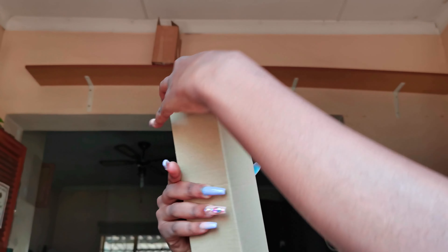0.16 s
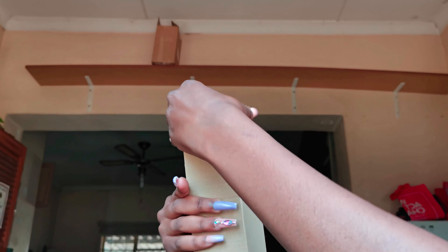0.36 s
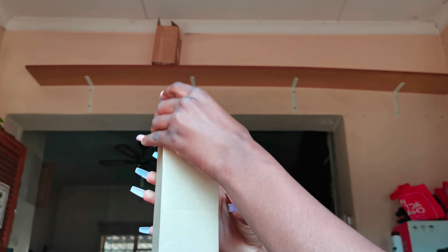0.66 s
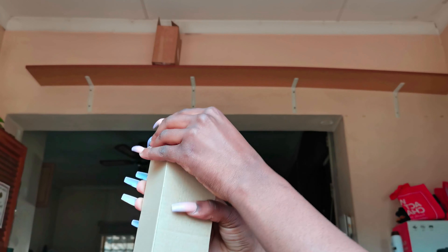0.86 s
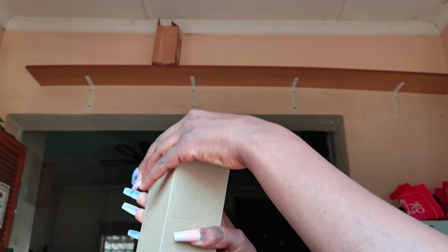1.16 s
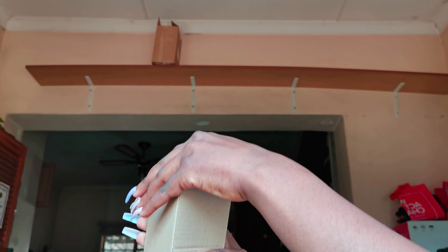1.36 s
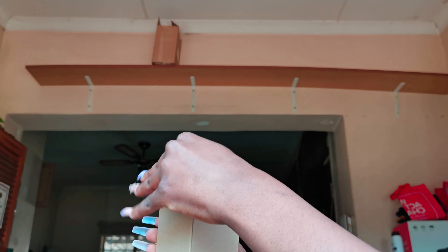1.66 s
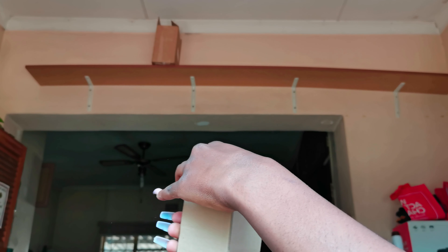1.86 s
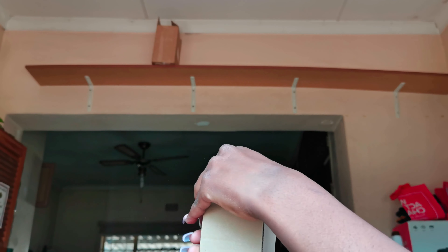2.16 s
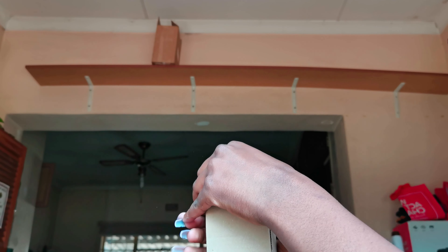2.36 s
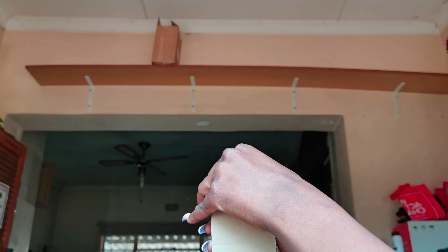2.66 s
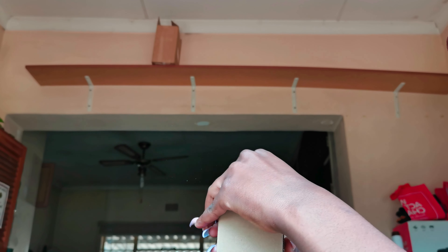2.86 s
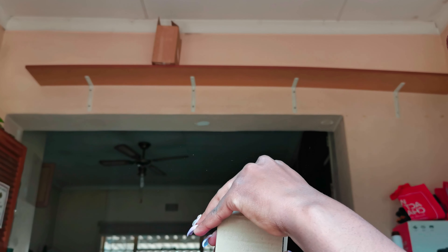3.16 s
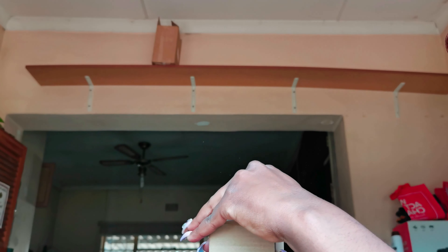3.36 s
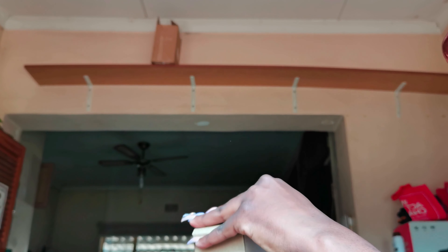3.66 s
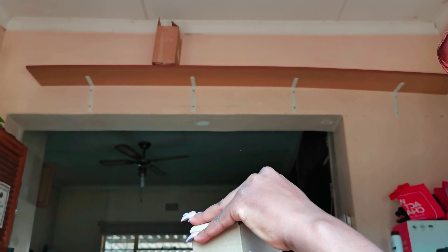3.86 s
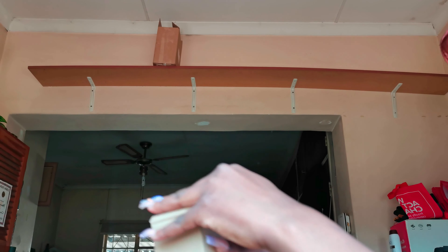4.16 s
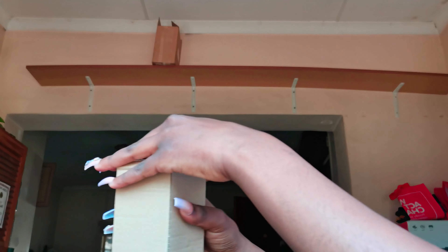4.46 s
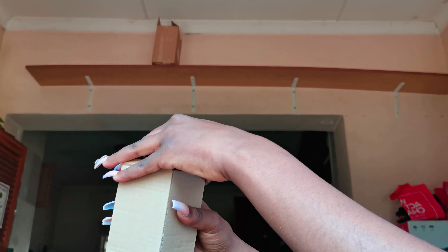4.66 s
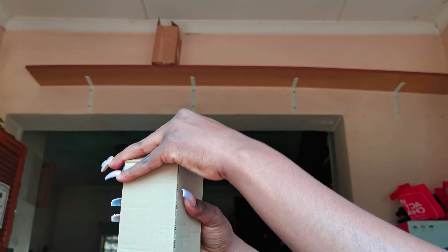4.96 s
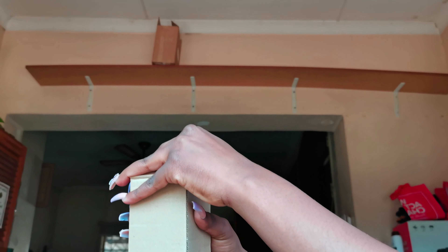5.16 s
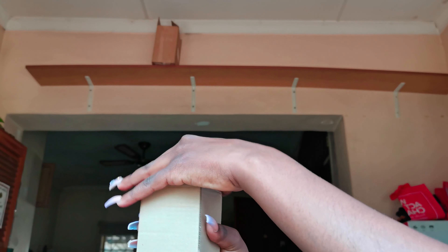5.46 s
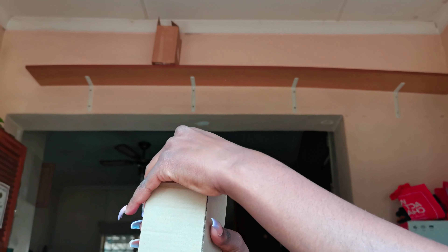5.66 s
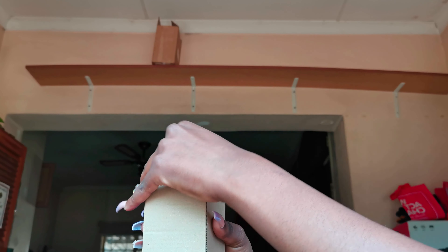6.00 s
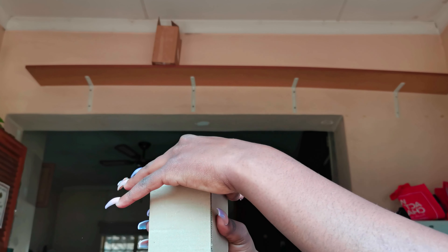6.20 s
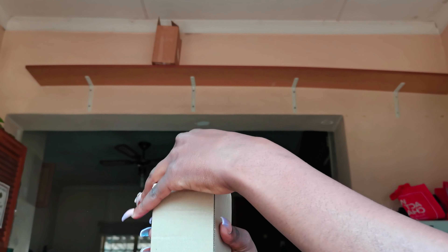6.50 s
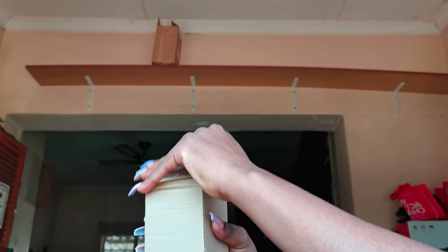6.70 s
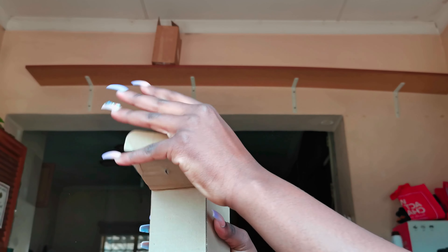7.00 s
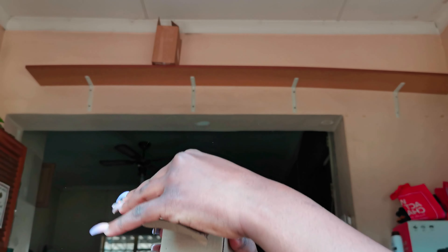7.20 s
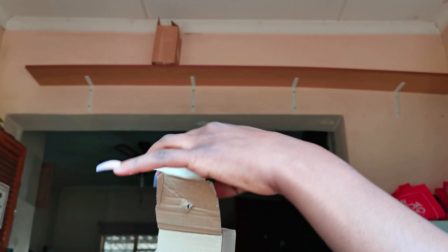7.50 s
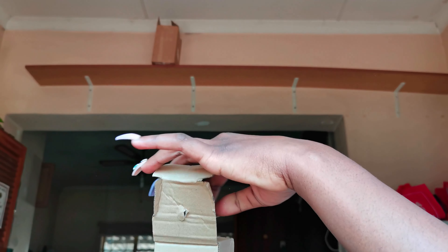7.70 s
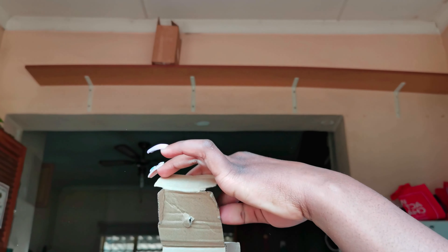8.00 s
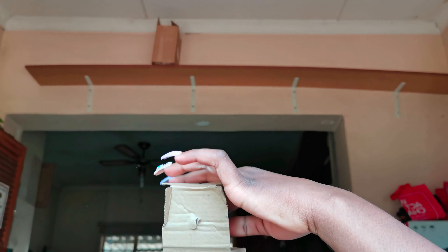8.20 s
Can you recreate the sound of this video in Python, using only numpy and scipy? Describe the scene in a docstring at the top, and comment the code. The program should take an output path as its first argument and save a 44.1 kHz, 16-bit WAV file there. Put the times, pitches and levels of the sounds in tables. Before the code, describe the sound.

Hands grip and rub a narrow cardboard box close to the microphone. Palms drag with a soft hollow sound while long fingernails scratch, tick and tap unevenly on its sides. A hard knock on the box comes early and another just past the middle, followed by a burst of quick scratches and more light tapping. The room is small and quiet, with a faint low hum.

```python
"""Long nails on a cardboard box

A small room, two microphones close to a narrow box that hands grip, scrape and tap. Palms drag on the
panels and stir the hollow; nails stick and slip on the paper skin, and its fibres hiss. Nail ticks,
taps and two hard knocks sound on the same box, over quiet room tone and a low hum."""
import sys
import numpy as np
from scipy import signal
from scipy.fft import rfft, irfft, next_fast_len
from scipy.io import wavfile
from scipy.ndimage import uniform_filter1d

SR = 44100
rng = np.random.default_rng(int(sys.argv[2]) if len(sys.argv) > 2 else 0)


def file_out(sig):
    """Save sig as 16-bit WAV at sys.argv[1]."""
    # one column per channel
    cols = np.atleast_2d(sig).T
    # limit, then scale
    lim = np.clip(cols, -1, 1)
    pcm = np.round(lim * 32767).astype(np.int16)
    wavfile.write(sys.argv[1], SR, pcm)


N = 367794
T = np.arange(N) / SR
COARSE = T[::32]  # time grid for slow movements, s

# modes of the box's hollow: f/Hz, level/dB, t60/s, share at the right microphone (-1..1)
HOLLOW_MODES = [(137.4, 2.6, 0.08, 0.84), (212.4, -1.7, 0.046, 0.68), (264.6, -3.15, 0.058, 0.52),
                (320.6, -0.5, 0.031, 0.91), (383.5, 0.87, 0.031, 0.86), (461, -1.2, 0.038, 0.8),
                (553.4, 1.55, 0.024, 0.97)]
# modes of the panels: f/Hz, level/dB, t60/s, share at the right microphone (-1..1)
PANEL_MODES = [(706, -1.5, 0.023, 0.6), (794, 5, 0.026, 0.58), (893, 3, 0.017, 0.62),
               (1022, 5, 0.022, -0.16), (1236, 1, 0.019, 0.73), (1345, 3, 0.026, -0.39),
               (1548, 3.5, 0.013, 0.98), (1703, 3.5, 0.026, 1), (1871, 5.5, 0.02, 0.74),
               (2112, 0, 0.016, 1), (2422, -1, 0.016, 0.49), (2830, -12, 0.045, 0.15)]
# spectrum of scraped paper fibres: f/Hz, level/dB
FIBRE_SPECTRUM = [(1590, -16.5), (2700, 5.5), (3070, -7), (3740, -2), (5240, -8), (6350, -7), (7010, -5.5),
                  (7590, -4), (8800, -22), (11400, -46), (19400, -120)]
# spectrum of the finest crackle and the nail ticks: f/Hz, level/dB
CRACKLE_SPECTRUM = [(5410, -46.5), (9200, -14), (9930, 3), (12800, -3.5), (14800, -0.5), (16000, -31)]
# hand strokes: peak t/s, swell/s, fade/s, palm/dB, nail/dB, fibre/dB, crackle/dB,
# panel centre f/Hz, hollow centre f/Hz
STROKES = [(0.02, 0.12, 0.097, -42.5, -51, -51, -50, 1480, 318),
           (0.093, 0.11, 0.066, -30.5, -34, -36, -38.5, 1090, 340),
           (.2, 0.066, 0.067, -46, -53, -47.5, -46, 1180, 336),
           (.26, 0.056, 0.19, -34, -47, -49.5, -52, 1380, 227),
           (.46, 0.063, 0.13, -33, -43, -44.5, -46, 1200, 450),
           (.56, 0.044, 0.13, -34, -62, -68, -83, 980, 180),
           (0.758, 0.056, 0.15, -34.5, -42.5, -52, -65, 810, 258),
           (.9, 0.076, 0.14, -41.5, -46, -53, -46.5, 910, 181),
           (1.059, 0.15, 0.096, -37, -40.5, -44.5, -43, 860, 490),
           (1.2, 0.069, 0.032, -44.5, -52, -52, -64, 930, 149),
           (1.295, 0.036, 0.052, -55.5, -54, -53.5, -64, 1340, 497),
           (1.83, 0.043, .12, -43, -55.5, -50, -50, 1530, 163),
           (1.954, 0.088, 0.058, -39.5, -46.5, -49, -47, 1130, 377),
           (2.188, 0.14, 0.19, -50, -53, -58, -63.5, 1450, 435),
           (2.339, 0.05, 0.095, -40.5, -42.5, -51.5, -61, 900, 450),
           (2.466, 0.08, 0.22, -51.5, -52.5, -56, -64, 1010, 280),
           (2.649, 0.053, 0.059, -45.5, -44, -48, -48.5, 2070, 380),
           (2.82, 0.086, 0.24, -55, -54.5, -66.5, -79, 1650, 358),
           (3.004, 0.064, 0.055, -44.5, -42.5, -43.5, -46, 1120, 310),
           (3.32, 0.071, 0.11, -51, -51, -49.5, -49, 2130, 317),
           (3.404, 0.023, 0.14, -32.5, -43, -43.5, -51, 1080, 275),
           (3.48, 0.063, 0.12, -39, -43.5, -49.5, -49, 870, 396),
           (3.71, 0.079, 0.071, -48, -26.5, -40, -38, 1500, 449),
           (3.84, 0.036, 0.14, -54, -42.5, -42, -42, 1870, 418),
           (3.913, 0.12, 0.13, -49, -29, -36.5, -42, 1660, 463),
           (4.135, 0.032, 0.045, -37, -36.5, -40.5, -47, 1550, 304),
           (4.269, 0.038, 0.073, -44, -48, -47.5, -47.5, 1020, 300),
           (4.36, 0.1, 0.063, -50.5, -50.5, -47, -46.5, 1100, 342),
           (4.45, .03, 0.12, -49, -55.5, -52.5, -57, 1300, 400),
           (4.553, 0.044, .1, -40.5, -64.5, -73, -70, 1240, 196),
           (4.801, .08, 0.13, -51, -49.5, -59.5, -72, 815, 160),
           (5.11, 0.022, .07, -35.5, -27, -31.5, -43, 1400, 436),
           (5.19, 0.019, 0.047, -46, -28, -46, -60, 1330, 417),
           (5.245, 0.027, 0.04, -50, -40, -57.5, -65, 1270, 307),
           (5.39, 0.078, 0.078, -43, -39, -46, -57, 910, 374),
           (5.45, 0.1, 0.08, -51, -51, -51.5, -53, 900, 400),
           (5.51, 0.027, 0.087, -43.5, -54, -48, -52, 1360, 402),
           (5.61, 0.051, 0.12, -48, -50, -50.5, -58, 1410, 244),
           (5.74, 0.14, 0.15, -47.5, -42.5, -58, -75, 920, 400),
           (5.809, 0.064, 0.059, -46, -39.5, -46.5, -51.5, 1540, 400),
           (5.94, 0.16, 0.26, -48.5, -51.5, -54, -64, 1110, 380),
           (6.086, 0.052, 0.064, -37.5, -44, -50.5, -49, 860, 470),
           (6.224, .04, 0.059, -44.5, -50, -62, -56, 1180, 241),
           (6.392, 0.044, 0.053, -43.5, -45.5, -49, -49, 1540, 503),
           (6.519, 0.059, .14, -41.5, -41.5, -39.5, -40.5, 1140, 426),
           (6.678, 0.02, 0.078, -39, -33, -40.5, -41, 1630, 443),
           (6.77, 0.076, 0.083, -40.5, -44, -42, -47, 1400, 450),
           (6.878, 0.11, .13, -41.5, -50.5, -49, -44, 1380, 220),
           (7.071, 0.029, 0.11, -54.5, -53.5, -51.5, -53, 2170, 346),
           (7.151, .07, 0.096, -48, -52.5, -54, -61, 964, 410),
           (7.275, 0.047, .04, -65, -57.5, -52.5, -57, 1190, 226),
           (7.39, 0.059, .12, -34.5, -53, -53, -60, 1690, 193),
           (7.556, .04, 0.096, -40.5, -55, -51.5, -66, 1790, 390),
           (7.705, 0.044, 0.047, -40, -55, -66, -73, 814, 470),
           (7.84, 0.063, 0.11, -35.5, -37, -53.5, -55, 960, 303),
           (7.949, .03, 0.17, -38, -37.5, -50, -51.5, 1310, 390),
           (8.12, 0.19, 0.19, -49, -50, -48, -55, 1050, 273),
           (8.211, 0.02, 0.052, -33, -56, -40.5, -50, 1160, 282),
           (8.245, 0.016, 0.054, -57, -45.5, -44, -55, 2460, 318),
           (8.335, 0.041, .05, -36.5, -51.5, -75, -80, 1290, 218)]


def undb(db):
    """dB to gain."""
    return 10 ** (np.asarray(db) / 20)


def unit(x):
    """Scale to rms 1."""
    return x / np.sqrt(np.mean(x ** 2, axis=-1, keepdims=True))


def coloured(x, spectrum):
    """Filter by (f/Hz, level/dB) points joined on a log axis."""
    size = next_fast_len(x.shape[-1])
    hz, db = np.transpose(spectrum)
    log_f = np.log(np.arange(size // 2 + 1) * SR / size + 1)
    gain = undb(np.interp(log_f, np.log(hz), db))
    return irfft(rfft(x, size) * gain, size)[..., :x.shape[-1]]


def ring(x, hz, t60):
    """One decaying mode, unit power on unit noise."""
    r = np.exp(-np.log(1000) / (t60 * SR))
    w = 2 * np.pi * hz / SR
    return signal.lfilter([np.sin(w) * np.sqrt(2 * (1 - r * r))], [1, -2 * r * np.cos(w), r * r], x)


def wander(per_s):
    """Random levels, held and slewed on the coarse grid: a slow waver with spread near 1.5."""
    hold = int(len(COARSE) / T[-1] / per_s)
    steps = np.repeat(rng.standard_normal(len(COARSE) // hold + 1), hold)
    return 1.827 * uniform_filter1d(steps, hold)[:len(COARSE)]


def smooth(x):
    """From the coarse grid to every sample."""
    return np.interp(T, COARSE, x)


def room_tone():
    """The room's quiet air, drifting in level, with a wavering low hum."""
    # spectrum of the air: f/Hz, level/dB
    air_spectrum = [(15, -35), (25, 5.5), (78, 14.5), (229, -12.5), (354, -3), (2220, -20.5), (2610, -18),
                    (3160, -25), (7510, -29), (8830, -48), (9840, -24), (13600, -26.5), (16000, -30)]
    # bands of the hum: f/Hz, width/Hz, level/dB
    hum_bands = [(69.5, 17, -59.5), (136, 14, -58)]
    noise = rng.standard_normal((2, N)) + 0.76 * rng.standard_normal(N)
    air = undb(-51.5) * unit(coloured(noise, air_spectrum))
    drift = smooth(undb(1.8 * wander(per_s=3.66)))
    drive = rng.standard_normal(N)
    hum = sum(undb(db) * ring(drive, hz, t60=2.3 / width) for hz, width, db in hum_bands)
    return air * drift + hum


def stroke_gains():
    """Each stroke swells from silence and fades; gains of palm, nail, fibre and crackle."""
    flatten = 1.24  # over 1 flattens the top of a stroke
    edges = [1.04, 1.18, 1.27, 1.9]  # the higher, the sooner a layer dies toward the stroke's ends
    peak_s, swell_s, fade_s, *layer_db = np.array(STROKES)[:, :-2].T
    since = COARSE - peak_s[:, None]
    away = np.where(since < 0, -since / swell_s[:, None], since / fade_s[:, None])
    press = np.clip(1 - away ** flatten, 0, 1)
    return [smooth(np.sqrt(undb(db) ** 2 @ (press ** edge) ** 2)) for db, edge in zip(layer_db, edges)]


def touched_spot(t):
    """Centre pitches of panel and hollow, in Hz, as the hands move from stroke to stroke."""
    peak_s, *_, panel_hz, hollow_hz = np.transpose(STROKES)
    return np.interp(t, peak_s, panel_hz), np.interp(t, peak_s, hollow_hz)


def response(hz, centre_hz, octaves):
    """Modes near the touched spot's own pitch answer most."""
    return np.exp(-.5 * (np.log2(hz / centre_hz) / octaves) ** 2)


def stick_slip(per_s, spread_db, drag):
    """Friction: clicks of very uneven size over a smooth drag, rms near 1 at all times."""
    size_db = rng.exponential(1, N) * spread_db
    clicks = (rng.random(N) < per_s / SR) * undb(size_db) * rng.choice([-1, 1], N)
    force = clicks + drag * rng.standard_normal(N)
    return force / np.sqrt(uniform_filter1d(force ** 2, size=SR // 12) + 1e-12)


def rubbed_modes(force, modes, centre_hz, octaves, flicker_db, per_s):
    """A force spread over the modes near the touched spot; each share flickers as the hand moves."""
    total = np.sqrt(sum(response(hz, centre_hz, octaves) ** 2 for hz, *_ in modes))
    out = np.zeros((2, N))
    for k, (hz, db, t60, right) in enumerate(modes):
        share = smooth(response(hz, centre_hz, octaves) / total * undb(db + flicker_db * wander(per_s)))
        out += np.outer([1, right], (-1) ** k * ring(force * share, hz, t60))
    return out


def torn_fibres(slip, spectrum, flicker_db):
    """Fibre noise with clicks in it; the two microphones hear partly different fibres."""
    noise = rng.standard_normal(N) + rng.standard_normal((2, N))
    flicker = smooth(undb(flicker_db * wander(per_s=60)))
    return unit(coloured(slip + noise * flicker, spectrum))


def rubbing():
    """Palm drag feeds the hollow; nail slips ring the panels and the skin and tear the fibres."""
    # paper skin under a sliding nail: f/Hz, level/dB, t60/s, share at the right microphone (-1..1)
    skin_modes = [(3710, 1.5, 0.0067, 0.54), (4470, -4.5, 0.0073, 0.2), (5300, -4.5, 0.0079, -0.9),
                  (6350, 2.5, .006, -0.8), (7420, 3, 0.0046, -0.8)]
    palm, nail, fibre, fine = stroke_gains()
    panel_hz, hollow_hz = touched_spot(COARSE)
    drag = stick_slip(per_s=300, spread_db=2.4, drag=0.051)
    slip = stick_slip(per_s=1200, spread_db=2.8, drag=0.059)
    hollow = rubbed_modes(palm * drag, HOLLOW_MODES, hollow_hz, octaves=0.91, flicker_db=3.03, per_s=25)
    panels = rubbed_modes(nail * slip, PANEL_MODES, panel_hz, octaves=0.66, flicker_db=3.08, per_s=30)
    hiss = torn_fibres(0.58 * slip, FIBRE_SPECTRUM, flicker_db=2.8)
    fine_slip = stick_slip(per_s=460, spread_db=4.0, drag=0.064)
    crackle = torn_fibres(0.45 * fine_slip, CRACKLE_SPECTRUM, flicker_db=2.3)
    # the skin sings in a few broad rings that come and go with the nail's angle
    skin_force = fibre * undb(-2.5) * stick_slip(per_s=2500, spread_db=2.3, drag=.15)
    skin = rubbed_modes(skin_force, skin_modes, centre_hz=5030, octaves=2.5, flicker_db=3.0, per_s=12)
    return hollow + panels + skin + fibre * hiss + fine * crackle


def contact_bursts(count, t, spectrum, decay_s):
    """Stereo noise bursts, one a contact: a first snap over a short decay."""
    snap = undb(4) * np.exp(-t / 0.0008)
    noise = unit(coloured(rng.standard_normal((count, 2, len(t))), spectrum))
    return noise * (snap + np.exp(-t / decay_s)) / 2


def nail_ticks():
    """Nail tips click brightly on the paper; rows left, right, room feed."""
    # nail contacts: t/s, level/dB
    contacts = [(0.0948, -17.5), (0.432, -21), (1.1927, -36), (1.2884, -28.5), (1.513, -18), (2.331, -27.5),
                (2.441, -43), (3.3947, -31), (3.445, -31), (4.129, -40), (4.44, -43), (4.8236, -44),
                (4.9406, -26), (5.0866, -32), (5.0955, -17), (5.105, -16), (5.4976, -33), (5.5937, -42),
                (6.0745, -34.5), (6.6735, -32), (6.691, -24.5), (6.7695, -27), (7.359, -37), (7.3856, -35),
                (7.4056, -32), (7.444, -40), (7.5458, -35), (7.701, -37.5), (8.216, -34), (8.276, -34)]
    out = np.zeros((3, N + SR))
    t = np.arange(SR // 10) / SR
    ticks = contact_bursts(len(contacts), t, CRACKLE_SPECTRUM, decay_s=.0012)
    for (at_s, db), tick in zip(contacts, ticks):
        start = int(at_s * SR)
        out[:, start:start + len(t)] += undb(db) * tick[[0, 1, 0]]
    return out[:, :N]


def taps():
    """Each tap or knock rings hollow and panels and adds a short crack; rows left, right, room feed."""
    # blows on the box: t/s, level/dB, relative thump/dB, relative crack/dB, panel centre f/Hz,
    # relative room feed/dB
    blows = [(.103, -31, -8.5, -14, 1200, 11.5), (.239, -21.5, -8.5, -14, 1700, -12),
             (.433, -18.5, -28, -9, 1250, -6), (0.486, -25.5, -16, -6, 1150, 3),
             (.529, -29, 0, -28, 869, 1), (.544, -23, -30, -31, 930, -0.5),
             (.586, -20.5, -14, -33, 920, -2.5), (.609, -19.5, -11, -38, 895, -27),
             (.753, -31.5, -16, -21, 784, 8.5), (.852, -22.5, -10, -30, 910, -1.5),
             (.902, -29.5, -29, -14, 754, 8.5), (1.51, -3, -14, -16.5, 1060, 9.5),
             (1.818, -27, -14.5, -9, 1630, 2), (1.948, -24.5, -19, -9.5, 834, -4),
             (2.177, -33, -7, -9.5, 1710, -10), (2.261, -34, -1.5, -19, 1270, 9),
             (2.329, -33.5, 5, -8.5, 783, 3), (2.443, -30.5, -5, -14, 1280, -13),
             (2.47, -27.5, -5, -18, 840, -11), (2.636, -32.5, -18, -8, 2500, 5),
             (3.004, -24.5, -12.5, -8.5, 1960, -6), (3.33, -32.5, -26, -5.5, 2140, 7),
             (3.394, -15.5, -21, -13, 1800, -3), (3.398, -20.5, 0, -15, 703, -8),
             (3.445, -25, -14, -4.5, 829, 0), (3.659, -26.5, -32, -27, 1590, 12),
             (3.819, -39, -33, 1.5, 1910, 6), (4.025, -18.5, -26, -36, 1280, -4),
             (4.045, -24, -25, -21, 813, 5), (4.062, -30, -24, -20, 950, 3),
             (4.087, -18, -19, -25, 1530, 2), (4.123, -18, -12.5, -29, 1672, -7),
             (4.365, -22, -31, -24, 1000, -5), (4.427, -26.5, -5, -15, 1560, 0.5),
             (4.547, -36.5, 6.5, -9, 813, -12), (4.938, -22.5, -7, -23, 1310, -1),
             (4.942, -1, -15.5, -21.5, 1750, -4), (5.087, -22.5, -25, -17, 1180, -2),
             (5.097, -26, -24, -21, 1200, -4), (5.105, -22, -35, 0, 2110, -18),
             (5.114, -18, -27, -28, 1260, 3.5), (5.129, -19, -20, -19, 1660, 2),
             (5.139, -22, -11, -24, 1200, -18), (5.18, -20, -33, -13, 1200, -4),
             (5.187, -18, -31, -19, 1500, -9), (5.201, -22, -32, -29, 1400, -5),
             (5.207, -18.5, -42, -16, 1150, 3), (5.239, -20.5, -32, -25, 870, -21),
             (5.251, -18, -29, -28, 1310, -8), (5.498, -20.5, -20, -13, 1800, -1.5),
             (5.802, -19, -25, -12, 1470, -4), (6.076, -17, -12, -13, 837, -12),
             (6.217, -31.5, -19, -21, 2300, -5), (6.674, -19.5, -28, -2, 1750, 3),
             (6.69, -28, -11, -10, 805, -15), (6.836, -26, -13, -0.5, 1380, 3.5),
             (7.343, -32.5, -12, -18, 1700, -16), (7.359, -17, -12, -23, 1240, -9),
             (7.387, -24.5, -16, -13, 1690, -14), (7.401, -18, -19, -17, 1800, -1),
             (7.526, -30, -3, -20, 1880, -4), (7.546, -29, -0.5, -1.5, 1240, -4.5),
             (7.701, -29.5, -9.5, -16.5, 850, 4), (7.794, -33.5, 0, -38, 1150, 8.5),
             (7.929, -13, -22, -21, 1600, 0), (7.937, -17, -21, -12.5, 1530, -14),
             (8.101, -24.5, -35, -6, 1900, 0.5), (8.2, -26, 0, -7.5, 830, -0.5),
             (8.243, -25, -20, -18, 2540, -17)]
    out = np.zeros((3, N + SR))
    t = np.arange(SR // 10) / SR
    hz, mode_db, t60, right = np.array(HOLLOW_MODES + PANEL_MODES).T
    hollow = np.arange(len(hz)) < len(HOLLOW_MODES)
    pickup = np.array([np.ones_like(hz), right])
    scatter = rng.standard_normal((len(blows), 2, len(hz)))
    cracks = contact_bursts(len(blows), t, FIBRE_SPECTRUM, decay_s=0.0068)
    for blow, (uneven, detune), crack in zip(blows, scatter, cracks):
        at_s, db, thump_db, crack_db, panel_hz, room_db = blow
        thump = response(hz, touched_spot(at_s)[1], octaves=0.56)  # narrower than under a rub
        panel = response(hz, panel_hz, octaves=0.9)
        gain = undb(mode_db + 0.99 * uneven) * np.where(hollow, thump, panel)
        gain[hollow] *= 2 * undb(thump_db) / np.linalg.norm(gain[hollow])
        gain[~hollow] /= np.linalg.norm(gain[~hollow])
        # harder blows press longer and ring longer
        contact_s = 0.00063 * undb(0.82 * db)
        ring_s = 1.17 * undb(0.16 * db) * t60[:, None]
        envelope = np.exp(-np.log(1000) * t / ring_s) * (1 - np.exp(-t / contact_s))
        rings = np.sin(2 * np.pi * np.outer(hz * (1 + 0.015 * detune), t)) * envelope
        hit = (gain * np.sign(detune) * pickup) @ rings + undb(crack_db) * crack
        start = int(at_s * SR)
        out[:, start:start + len(t)] += undb([[db], [db], [db + room_db]]) * hit[[0, 1, 0]]
    return out[:, :N]


def room_tail(feed):
    """The small room's dense tail, different at each microphone, treble dying first."""
    # decay of the room: f/Hz, t60/s
    decay_times = [(100, .4), (260, 0.32), (700, 0.29), (1840, 0.27), (4850, 0.27), (12800, 0.23)]
    hz, t60 = np.transpose(decay_times)
    gap_s, alike_below_hz = 0.00082, 1860
    t = np.arange(int(.6 * SR)) / SR
    tail = 0
    for f in 90 * 2. ** np.arange(8):
        octave = signal.butter(2, [f / 2 ** .5, f * 2 ** .5], "band", fs=SR, output="sos")
        band = signal.sosfilt(octave, rng.standard_normal((3, len(t))))
        ring_s = np.interp(np.log(f), np.log(hz), t60)
        band *= np.exp(-np.log(1000) * t / ring_s) * (t > gap_s)
        band /= np.sqrt(np.sum(band ** 2, axis=1, keepdims=True) / (f / SR * 2 ** .5))
        alike = np.clip(1 - f / alike_below_hz, 0.1, 1)  # long waves reach both microphones alike
        tail = tail + np.sqrt(alike) * band[2] + np.sqrt(1 - alike) * band[:2]
    return undb(-0.5) * signal.fftconvolve(feed[None], tail, axes=1)[:, :N]


def scene():
    """Rubbing, taps and ticks up close; the room's tail and tone behind them."""
    rub = rubbing()
    hits = taps() + nail_ticks()
    room_feed = undb(-6.5) * rub[0] + hits[2]
    return rub + hits[:2] + room_tail(room_feed) + room_tone()


def record(dry):
    """The right microphone has a rear port and less bass and treble; peaks clip; the top is cut."""
    port_lag_s, port_share = 0.00059, 0.41
    bass_hz, shelf_hz, top_hz = 60, 9050, 16000
    # sound entering the rear port pushes the other way, a little later
    lag = int(port_lag_s * SR)
    right = dry[1] - port_share * np.concatenate([np.zeros(lag), dry[1, :-lag]])
    right = signal.sosfilt(signal.butter(1, bass_hz, "high", fs=SR, output="sos"), right)
    right = coloured(right, [(shelf_hz / 2 ** .5, -1), (shelf_hz * 2 ** .5, -9)])
    both = np.clip(np.array([dry[0], right]), -1, 1)
    return signal.sosfilt(signal.ellip(10, .2, 80, top_hz, fs=SR, output="sos"), both)


dry = scene()
out = record(dry)
file_out(out)
```